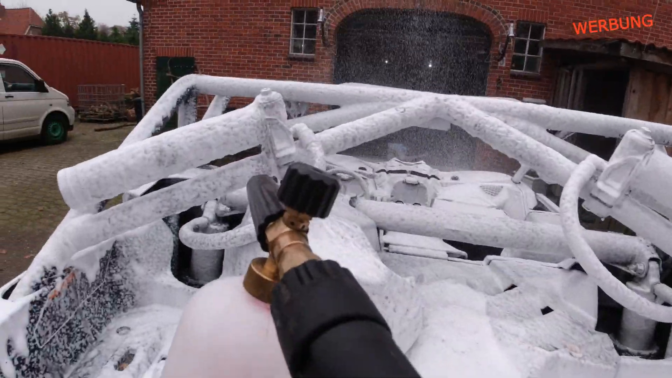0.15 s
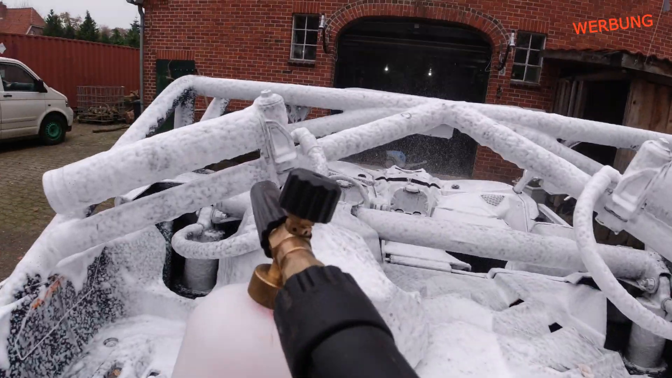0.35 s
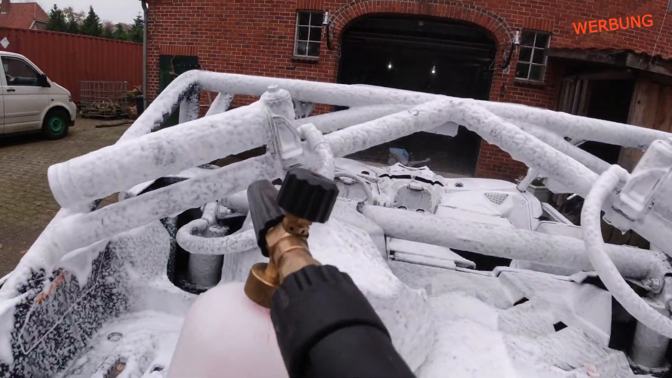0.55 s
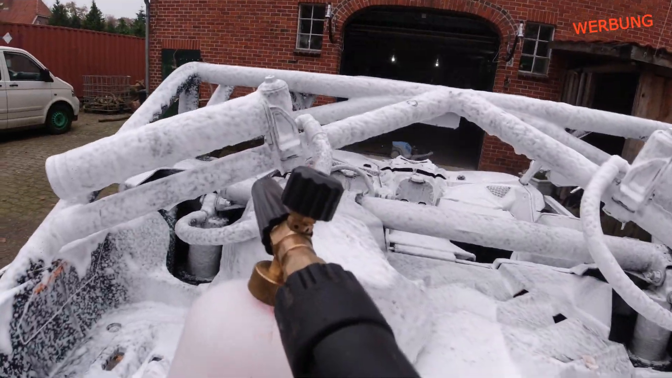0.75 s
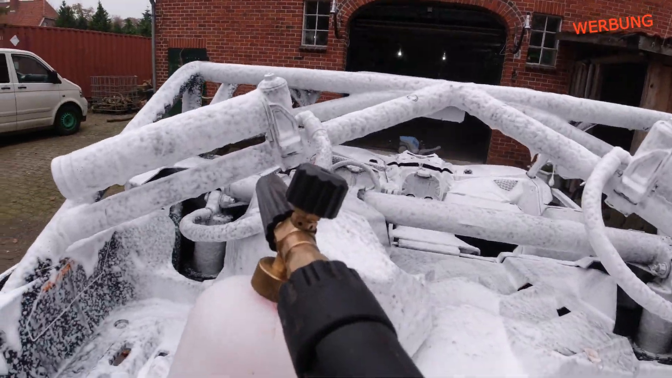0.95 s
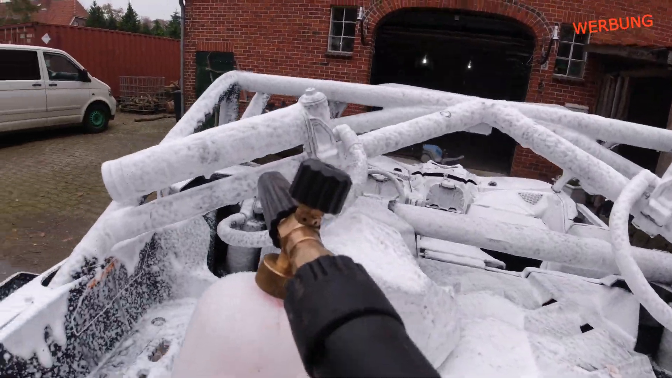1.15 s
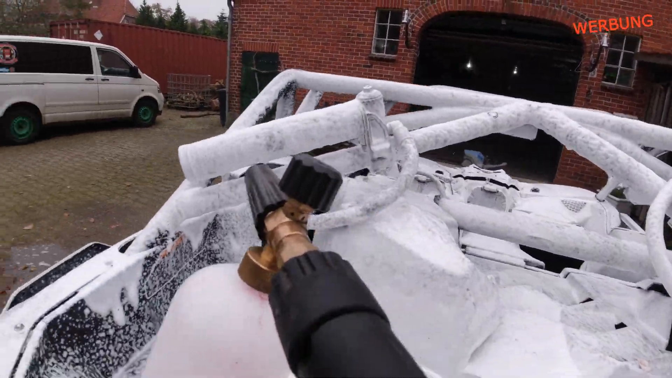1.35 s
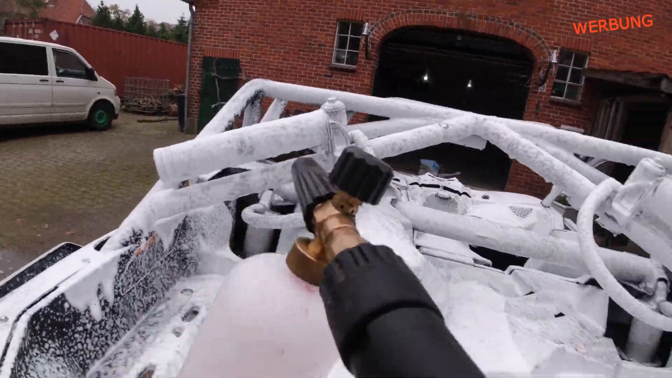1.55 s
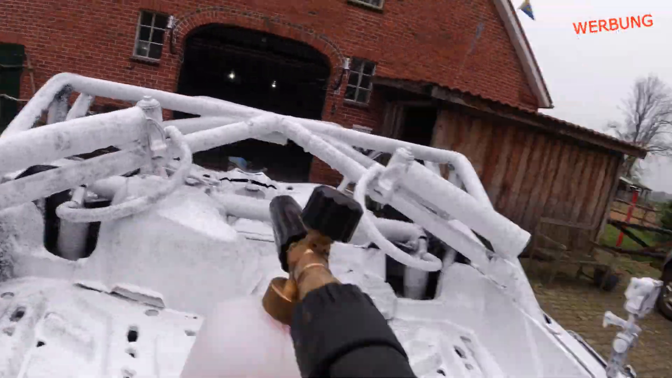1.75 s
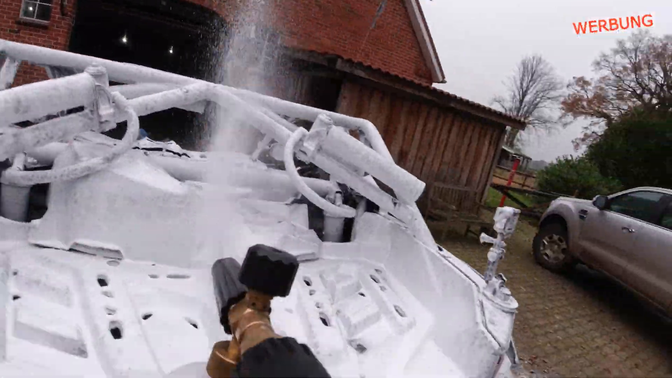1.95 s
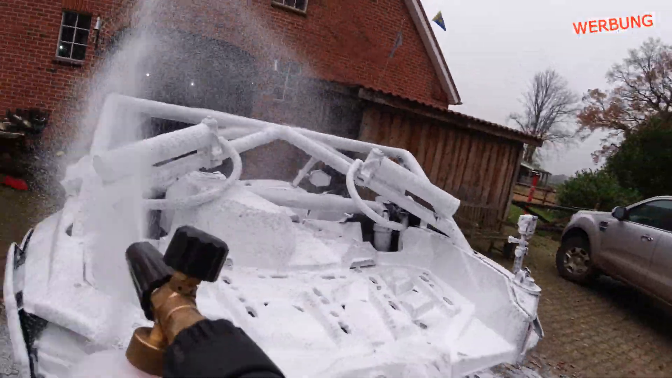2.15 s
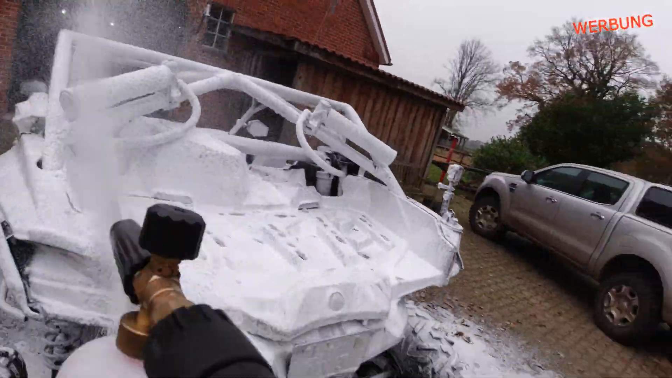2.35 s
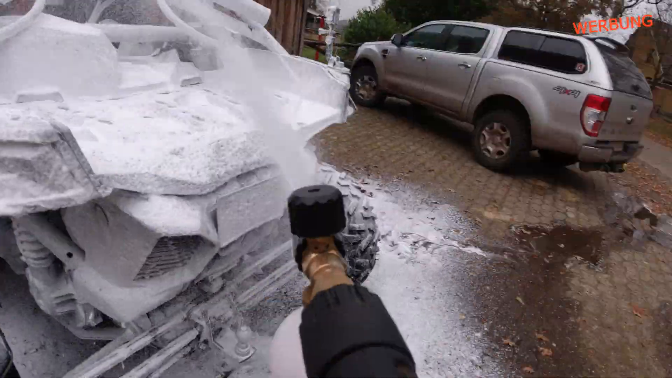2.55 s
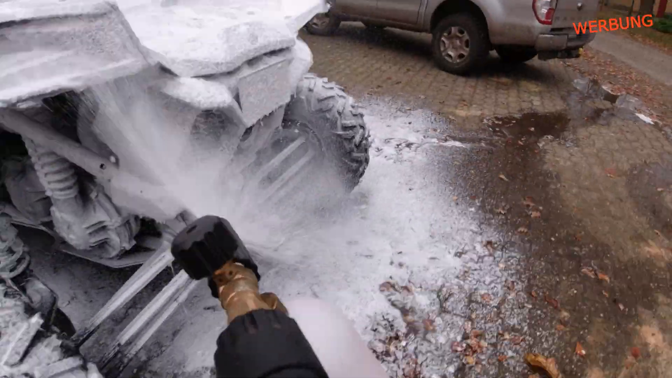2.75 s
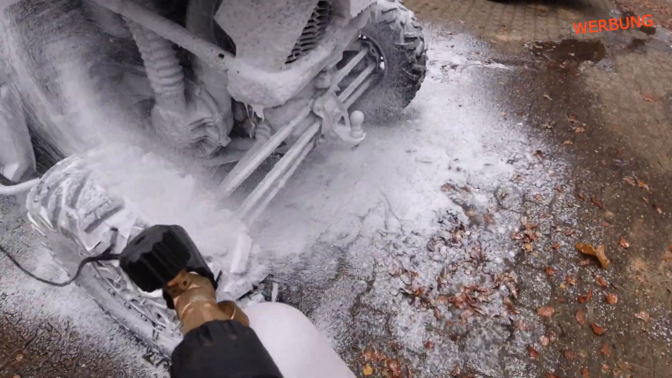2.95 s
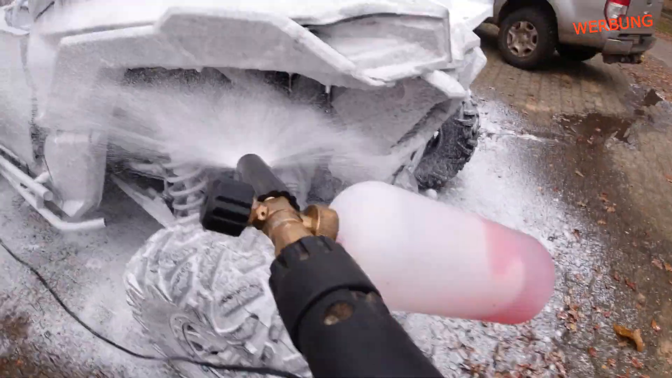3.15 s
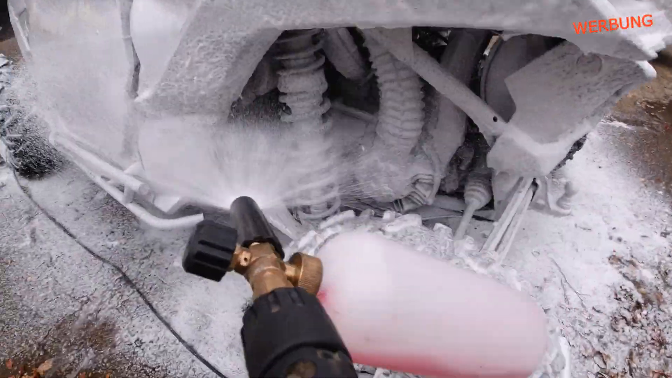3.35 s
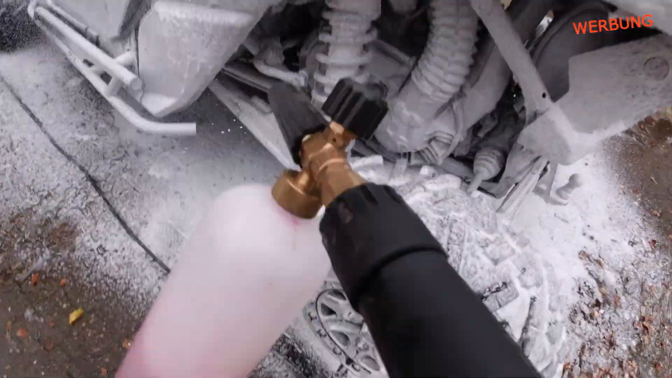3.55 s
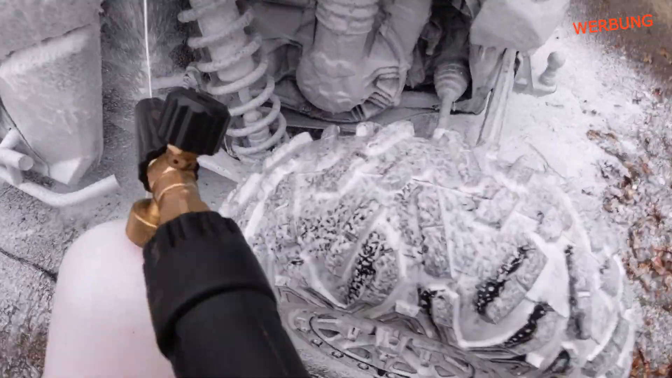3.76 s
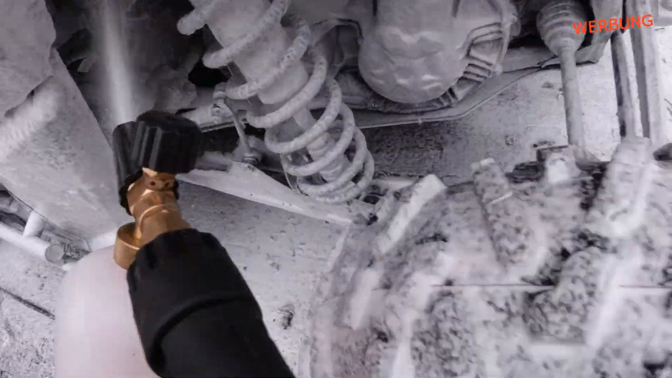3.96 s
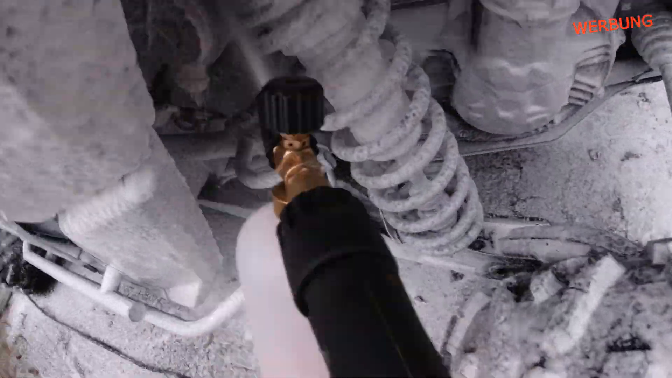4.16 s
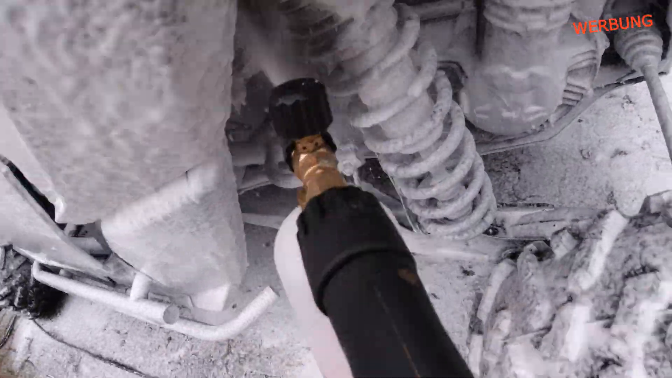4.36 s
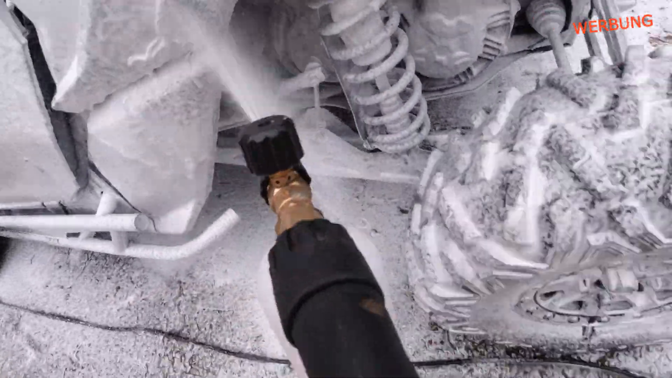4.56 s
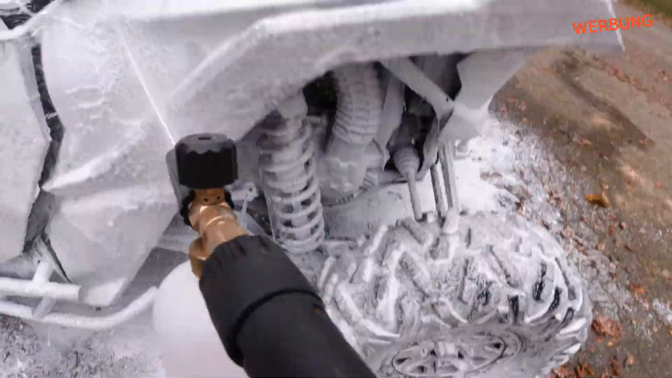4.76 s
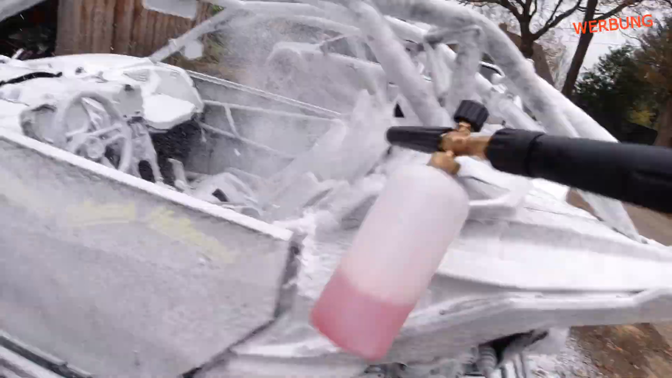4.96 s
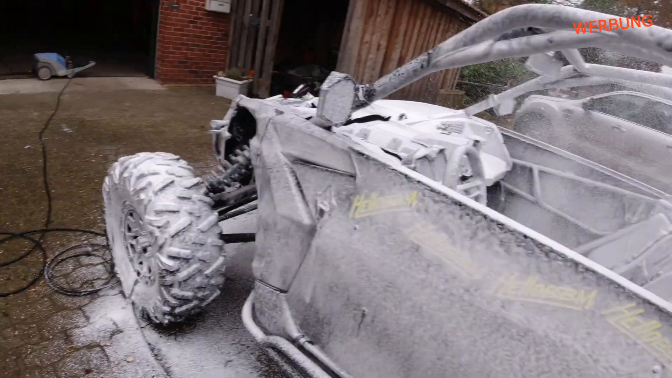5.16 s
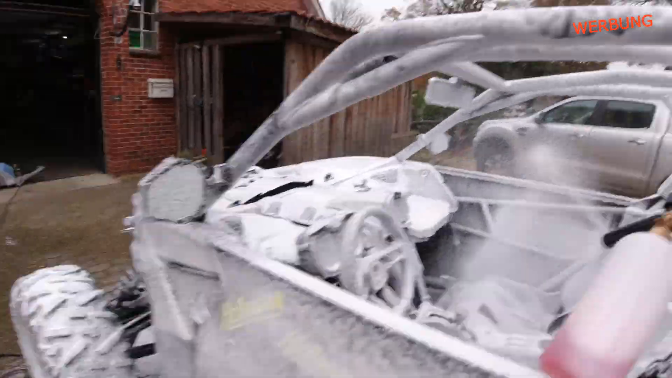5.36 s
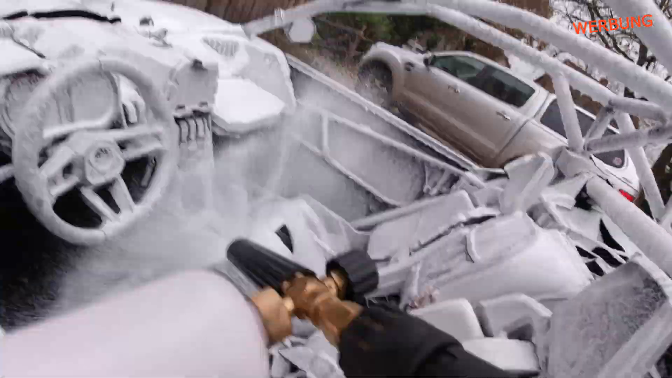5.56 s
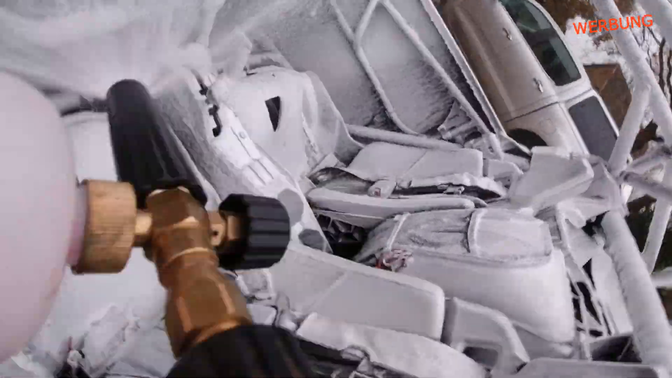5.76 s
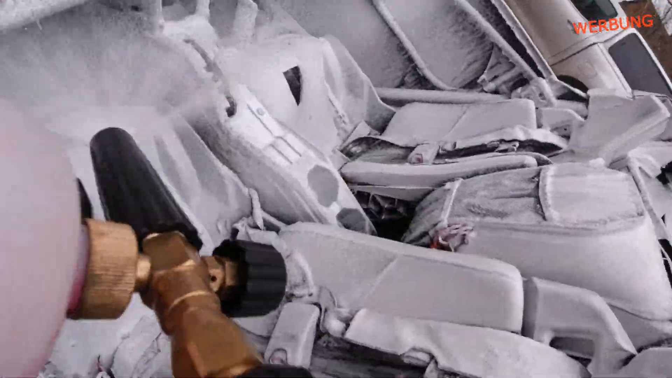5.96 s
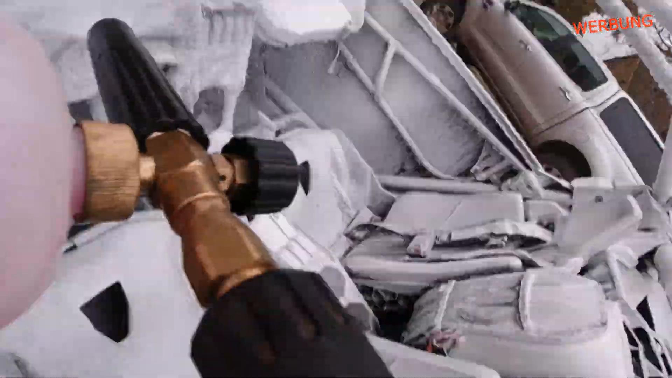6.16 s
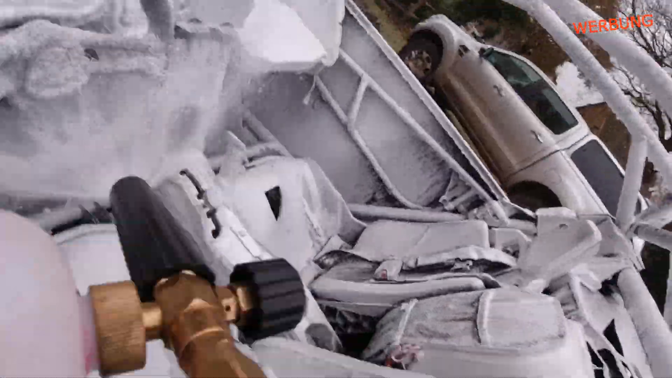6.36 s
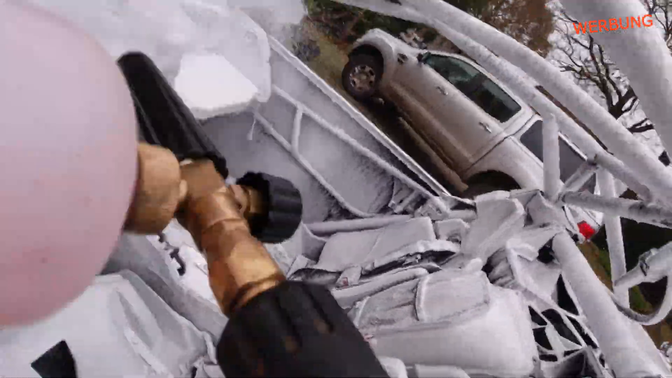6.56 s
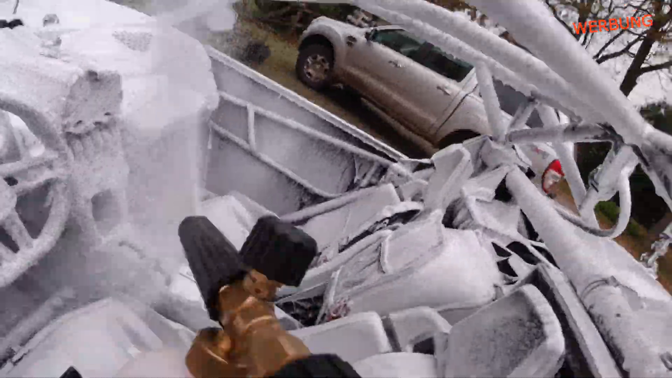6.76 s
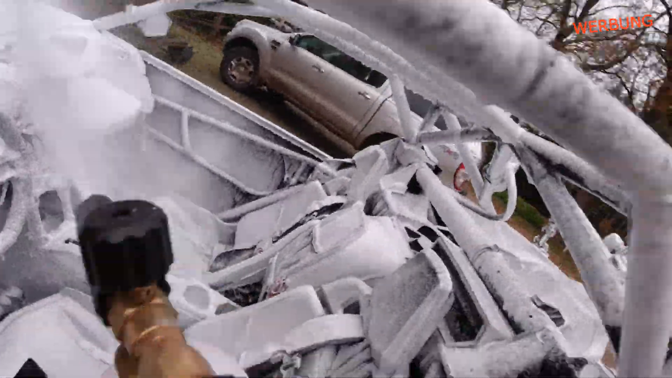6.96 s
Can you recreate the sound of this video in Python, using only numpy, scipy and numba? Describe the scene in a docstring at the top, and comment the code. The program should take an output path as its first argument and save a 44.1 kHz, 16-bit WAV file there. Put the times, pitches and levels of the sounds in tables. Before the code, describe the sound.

Outdoors in a yard, a pressure washer's foam jet cuts off at once, leaving faint clothing rustle and trigger clicks. Then it sprays a vehicle three times, close to the microphone, each pull starting with a spit and settling into a bright, ringing hiss with fine spatter. The pump hums and whines faintly further off. During the last pull the hiss dips briefly and the hose and lance knock dully.

```python
"""A pressure washer with a foam cannon lathers an off-road buggy in a yard, 7 s, heard by a worn two-port microphone.
The jet dies at once, the unloader sings (shaped noise); clothes rustle (drops); the heard background level rises slowly.
At 1.9, 3.8 and 4.8 s the jet spits, gulps air and hisses: resonant noise for the nozzle, drops for foam on panels.
Its pump hums and whines further off (unsteady sines); clicks (noise bursts) fall between the pulls.
In the last pull the operator turns to the pump, then reaches into the cabin; hose and lance knock (noise, modes)."""
import sys
import numpy as np
from scipy import signal
from scipy.fft import rfft, irfft
from scipy.io import wavfile
from scipy.ndimage import uniform_filter1d
from numba import njit

SR = 44100
rng = np.random.default_rng(int(sys.argv[2]) if len(sys.argv) > 2 else 0)


def wav_record(signal):
    """Record a signal, one row per channel, as 16-bit PCM in the file named by sys.argv[1]."""
    frames = np.transpose(np.atleast_2d(signal))
    bounded = np.clip(frames, -1, 1)
    # unit amplitude maps onto the largest positive 16-bit level
    quanta = np.round(bounded * 32767).astype(np.int16)
    wavfile.write(sys.argv[1], SR, quanta)


N = 308700
T = np.arange(N) / SR
HZ = np.maximum(np.fft.rfftfreq(N, 1 / SR), 1)
ALL_HZ = (0, SR)
PISTON_HZ = 141


def cannon():
    """Sum of the jet's parts, each gated by flow or foam, with body shadow and reflections; mid and side."""
    flow, foam = valve()
    sputter = jet_sputter()
    direct = (nozzle_ring(sputter) + edge_graze(sputter)) * foam
    direct = direct + nozzle_upper_ring(sputter) * np.sqrt(flow * foam)
    direct = direct + (jet_rush(sputter) + panel_drum(sputter) + panel_boom()) * flow
    mid, side = reflected(body_shadow(direct))
    side_db = -.3 + 3.6 * in_cabin()  # nozzle off to one side
    return np.array([mid, side * undb(side_db)]) + foam_splatter() * flow


# trigger pulls: [opens t/s, air gap t/s, gap depth level/dB, closes t/s, time to die away/s, strength level/dB]
TRIGGER_PULLS = [(-1.0, -.9, -20, .007, .07, -5.5), (1.881, 1.962, -22, 3.560, .12, 0),
                 (3.782, 3.857, -23, 4.681, .12, -.2), (4.809, 4.884, -15, 8.0, .12, -.7)]


def valve():
    """Gains of flow and of foam through the gun: trapped pressure spits, air gulps, then foam follows."""
    flow, foam = 0, 0
    for opens, gap, gap_db, closes, dying_s, db in TRIGGER_PULLS:
        spit_s = [opens - .03, opens - .011, opens, opens + .012,
                  gap - .023, gap - .006, gap + .008, gap + .020, gap + .034]
        spit_db = np.interp(T, np.sort(spit_s), [-62, -30, 2.2, 0, -4.5, gap_db, gap_db, -6, 0])
        closing = (T - closes) / dying_s
        shut = undb(-np.interp(closing, [0, .11, .33, 1, 2.5], [0, 16, 35, 50, 90]))
        gate = undb(db + spit_db) * shut * (T > opens - .03)
        refill_db = np.interp(T, [gap - .03, gap, gap + .07], [-3, -9, 0])
        flow = flow + gate
        foam = foam + gate * np.sqrt(shut) * undb(refill_db)
    return flow, foam


def jet_sputter():
    """Gain of the jet: slugs of air and soap at random, plus a slight throb from the pistons."""
    piston = np.cos(2 * np.pi * np.cumsum(PISTON_HZ * (1 + .015 * walk(12))) / SR)
    return undb(.6 * walk(520) + .22 * walk(70) + .35 * piston)


# lance swing: [t/s, nozzle to nearest panel/m]
LANCE_AIM = [(2.0, .21), (2.25, .29), (2.75, .37), (3.45, .38), (3.95, .22), (4.3, .19), (4.65, .25),
             (5.3, .3), (5.8, .24), (6.25, .225), (6.7, .3), (7.0, .27)]


def panel_distance_m():
    """Path from nozzle to nearest panel as the lance swings."""
    return curves(LANCE_AIM)[0]


def nearness():
    """Closeness to the panel, 1 at the usual .33 m."""
    return .33 / panel_distance_m()


def turned():
    """How far the operator faces from the jet towards the pump, 0-1."""
    return np.interp(T, [4.99, 5.27, 5.61], [0, 1, 0])


def in_cabin():
    """How far the operator has reached into the cabin, 0-1."""
    return np.interp(T, [5.4, 5.8], [0, 1])


def aimed(usual_db, halving_db, cabin_db, turned_db):
    """Gain of a spray part: at usual distance, plus per halving of it, in the cabin and when turned."""
    moves_db = halving_db * np.log2(nearness()) + cabin_db * in_cabin() + turned_db * turned()
    return undb(usual_db + moves_db)


# nozzle resonances: [f/Hz, width at half amplitude/Hz, level/dB]
NOZZLE_MODES = [(4210, 450, 0), (4030, 520, -7), (4900, 1300, -19)]
# ring flares as the nozzle swings past the listener: [t/s, length/s, level/dB]
RING_FLARES = [(2.28, .25, 3), (4.0, .07, 6), (4.44, .17, 5), (4.6, .1, 2.5), (5.79, .07, 8),
               (6.07, .09, 6.5), (6.33, .06, 4), (6.93, .15, 4.5)]


def nozzle_ring(sputter):
    """Noise driving the nozzle's main resonances; pitch wavers as foam in the bore thickens and thins."""
    among_panels = np.interp(T, [3.5, 3.9], [.3, 1])
    flare_db = sum(hump(*flare) for flare in RING_FLARES)
    flicker_db = 2.0 * among_panels * walk(24)
    source = noise() * sputter * undb(.6 * walk(250))
    ring = heard(source, resonances(NOZZLE_MODES), (3800, 4700), lead=.88)
    ring = ring * aimed(-30.4, -3.8, -2.3, -17) * undb(flare_db + flicker_db)
    return delayed(ring, .00045 * among_panels * walk(9))


# upper nozzle resonances: [f/Hz, width at half amplitude/Hz, level/dB]
NOZZLE_UPPER_MODES = [(7620, 1650, 0), (8750, 800, -11)]


def nozzle_upper_ring(sputter):
    """Noise driving the nozzle's broad upper resonances, level unsteady."""
    upper = heard(noise() * sputter, resonances(NOZZLE_UPPER_MODES), (6900, 8500))
    return upper * aimed(-35.8, -2.3, -2.5, -19) * undb(1.0 * walk(14))


# sliding note of foam grazing an edge: [t/s, f/Hz]
GRAZE_NOTE = [(3.55, 4750), (3.9, 3600), (4.1, 4700), (4.27, 5400), (4.95, 4000), (5.13, 5150),
              (5.55, 5100), (6.1, 4000), (6.5, 3750), (7.0, 4600)]


def edge_graze(sputter):
    """The fan of foam on an edge: noise through two moving band-passes."""
    hz, = curves(GRAZE_NOTE)
    edge = np.array([svf(svf(x, hz, 800.), hz, 800.) for x in noise() * sputter])
    return heard(edge, 1, ALL_HZ, lead=.7) * aimed(-43, 6.8, 1, -11.5)


# rush spectrum: [f/Hz, level/dB]
RUSH_SPECTRUM = [(40, -20), (120, -12.5), (230, -8), (350, -6), (500, -3), (850, -3), (1200, 1), (2000, 0),
                 (3100, 0), (5200, -1.5), (6200, -4), (9000, -5.5), (12500, -19), (16000, -24)]


def jet_rush(sputter):
    """Dense drops of the jet, broadband."""
    rush = heard(drops(12000, 1.7) * sputter, shape(RUSH_SPECTRUM), (2300, 3300), lead=.7)
    return rush * aimed(-41.4, 1.7, .4, -9.8)


def panel_drum(sputter):
    """Drops ring the hollow between jet and panel, higher as it narrows; louder in the wheel arch."""
    hollow_hz = 1080 + 115 / panel_distance_m()
    hollow = np.array([svf(x, hollow_hz, 520.) for x in drops(4500, 1.8) * sputter])
    drum = heard(hollow, resonances([(1550, 2400, 0)]), (1420, 2100), lead=.8)
    arch_db = hump(4.33, .3, 5.5)
    return drum * aimed(-40.2, -1, 1.7, -8) * undb(arch_db)


# boom spectrum: [f/Hz, level/dB]
BOOM_SPECTRUM = [(60, -25), (250, -9), (450, -1), (650, 0), (900, -1.5), (1180, 2), (1500, -12),
                 (4000, -35)]


def panel_boom():
    """Low boom of drops on the bodywork."""
    return heard(drops(4000, 1.8), shape(BOOM_SPECTRUM), ALL_HZ, lead=.6) * aimed(-57, 5, 10, -1)


# splatter spectrum: [f/Hz, level/dB]
SPLATTER_SPECTRUM = [(500, -20), (3000, -4), (6000, 1), (10000, 2), (13000, 0), (16000, -1)]


def foam_splatter():
    """Fine treble impacts of foam; a splash deep in the wheel arch."""
    splatter = heard(drops(12000, 1.9), shape(SPLATTER_SPECTRUM), (11000, 15500), lead=.55)
    splash_db = hump(4.33, .11, 11)
    return splatter * aimed(-52.7, 8.3, 4, .3) * undb(splash_db)


def body_shadow(direct):
    """Treble screened by the operator's body when turned: subtracts a share of a 6300 Hz band."""
    screened = np.array([svf(x, np.full(N, 6300.), 4200.) for x in direct])
    return direct - .6 * turned() * screened


def reflected(direct):
    """Panel mirrors the hiss after the round trip, sliding its colour; paving answers about 6.2 ms later."""
    mirror = .19 * nearness()  # share of the hiss
    round_trip_s = 2 * panel_distance_m() / 343  # speed of sound, m/s
    panel = mirror * delayed(direct, round_trip_s * (1 + .05 * walk(13)))
    paving = .2 * delayed(direct, .0062 * (1 + .03 * walk(1.5)))
    return (direct + panel + paving) / np.sqrt(1 + mirror ** 2)


# how strongly the working pump carries across the yard: [t/s, level/dB]
PUMP_CARRY = [(.2, -66), (1.0, -57), (2.9, -57.5), (3.5, -49.5), (3.9, -56.5), (4.6, -56.5), (7.0, -62)]
# unloader valve sings when the flow stops: [t/s, level/dB]
UNLOADER_SONGS = [(.012, -44.5), (3.587, -40), (4.715, -53)]


def pump():
    """Hum at twice piston rate, motor drone and whine, louder under load; the unloader's song."""
    rise_s, fall_s = .16, .13
    load = 0
    for opens, _, _, closes, _, _ in TRIGGER_PULLS:
        load = load + np.clip(np.minimum((T - opens) / rise_s, 1 - (T - closes) / fall_s), 0, 1)
    carry_db, = curves(PUMP_CARRY)
    facing = turned()

    def carried(loaded_db, idle_db, facing_db):
        """Gain relative to the carry, plus changes when idling and when faced."""
        return undb(carry_db + loaded_db + idle_db * (1 - load) + facing_db * facing)

    hum = tone(2 * PISTON_HZ, .009, 2.6) + tone(PISTON_HZ, .009, 2.6) * undb(-17)
    drone_hz = 433 - 11 * np.maximum(T - 2.3, 0)  # sags 11 Hz/s from 2.3 s
    tones = hum * carried(-1.2, -24, -7)
    tones = tones + tone(drone_hz, .014, 3.2) * carried(-1.8, -17, 4)
    tones = tones + tone(1362, .0014, 1.6) * carried(4, -35, 18)
    song = heard(noise(), resonances([(1350, 80, 0), (1190, 130, -2)]), ALL_HZ)
    song_gain = sum(undb(db) * decay(np.maximum(T - s, 0), .2, .002) for s, db in UNLOADER_SONGS)
    return np.array([tones, 0 * tones]) + song * song_gain


def tone(hz, wander, flutter_db):
    """Sine of unit rms before its random pitch wander and level flutter."""
    phase = 2 * np.pi * np.cumsum(hz * (1 + wander * walk(30))) / SR
    return np.sqrt(2) * np.sin(phase) * undb(flutter_db * walk(18))


# clicks of trigger and lance: [t/s, level/dB, ring f/Hz]
GUN_CLICKS = [(.143, -57, 1700), (.151, -59, 2400), (1.682, -48, 2400), (1.709, -49, 3600),
              (1.824, -57, 3600), (3.596, -49, 2400), (3.664, -54, 3200), (3.672, -54, 3600),
              (3.680, -54, 2300), (3.740, -50, 3600)]
# dull knocks of hose and lance: [t/s, level/dB, thud f/Hz, ring level/dB, ring spread/octaves]
HOSE_KNOCKS = [(.02, -54, 330, 3, .9), (1.684, -59.5, 350, 19, .2), (3.668, -48, 70, -18, .7),
               (5.376, -38, 270, 2, .6), (5.394, -39, 220, 2.5, .6), (5.562, -38, 200, 2, .6),
               (6.424, -31, 370, 3, .9), (6.786, -35, 235, 2, .55)]
# modes the knocks ring: [f/Hz, t60/s, level/dB]
HOLLOW_MODES = [(150, .12, -5), (218, .22, 0), (255, .1, -4), (338, .14, -3), (405, .1, -3), (570, .09, -7),
                (650, .09, -7)]


def handling():
    """Sharp resonant clicks; knocks, each a noise thud and a short ring of modes."""
    out = np.zeros((2, N))
    age = np.arange(int(.4 * SR)) / SR

    def burst(hz, width, side_db):
        """Mid and side noise in one steep resonance, mid at unit level."""
        centre = np.full(len(age), float(hz))
        raw = rng.standard_normal((2, len(age)))
        x = np.array([svf(svf(n, centre, float(width)), centre, float(width)) for n in raw])
        return x / x[0].std() * undb([[0], [side_db]])

    def add(s, sound):
        """Mix a sound in at its time."""
        start = max(int(s * SR), 0)
        out[:, start:start + len(age)] += sound[:, :N - start]

    for s, db, hz in GUN_CLICKS:
        click = burst(hz, 1300, -8) + undb(-8) * burst(6200, 4000, -4)
        add(s, undb(db) * click * decay(age, .026, .0004))
    for s, db, thud_hz, ring_db, octaves in HOSE_KNOCKS:
        ring = 0
        for hz, t60, mode_db in HOLLOW_MODES:
            # modes near the blow's own pitch ring most
            size = undb(mode_db) / (1 + (np.log2(hz / thud_hz) / octaves) ** 2)
            mode_hz = hz * (1 + .02 * rng.standard_normal())
            mode = np.sin(2 * np.pi * (mode_hz * age + rng.random()))
            ring = ring + size * mode * decay(age, t60, .003)
        thud = burst(thud_hz, 1.1 * thud_hz, -9) * decay(age, .15, .004)
        add(s, undb(db) * (thud + undb(ring_db) * np.array([ring, 0 * ring])))
    return out


# rustle spectrum: [f/Hz, level/dB]
RUSTLE_SPECTRUM = [(200, -14), (1200, -2), (3000, 1), (5000, -3), (6000, -6), (7000, -4), (8500, -11),
                   (10000, -15), (16000, -25)]
# brushes of sleeve and hose: [t/s, length/s, level above the faint constant rustle/dB]
BRUSHES = [(.07, .12, 17), (.46, .11, 11), (1.18, .17, 9), (1.48, .17, 17), (1.78, .2, 15)]


def clothes():
    """Sleeve and hose brush: treble drops in short bursts."""
    rustle = heard(drops(6000, 2.1), shape(RUSTLE_SPECTRUM), (4500, 9000), lead=.3)
    return rustle * undb(-93 + sum(hump(*brush) for brush in BRUSHES))


# air stirring at the ports as the operator walks: [t/s, level/dB]
BUFFET_LEVEL = [(1.3, -88), (1.9, -70), (3.3, -69), (3.7, -64), (7.0, -61)]


def port_buffet():
    """Unsteady low noise of air at the ports."""
    spectrum = shape([(20, -4), (70, 0), (140, -2), (400, -24), (2000, -70)])
    level_db, = curves(BUFFET_LEVEL)
    return heard(noise(), spectrum, ALL_HZ, lead=.1) * undb(level_db + 3.8 * walk(11))


# foam run-off spectrum: [f/Hz, level/dB]
RUNOFF_SPECTRUM = [(200, -8), (650, -7), (950, 3), (1300, 0), (1650, 0), (2200, -2), (3200, -6),
                   (4500, -14), (6000, -24), (10000, -36), (16000, -44)]


def foam_runoff():
    """Foam fizzing and running off: shaped drops, at the background's heard level."""
    runoff = heard(drops(8000, 1.8), shape(RUNOFF_SPECTRUM), (700, 3000), lead=.3)
    return runoff * undb(background_db(-79.5, -68.5))


# open-air rumble spectrum: [f/Hz, level/dB]
YARD_SPECTRUM = [(25, -2), (60, -2), (130, 0), (210, 0), (320, -6), (440, -5), (540, -18), (1200, -35),
                 (16000, -60)]


def yard_rumble():
    """Open-air rumble: low noise, slightly unsteady, at the background's heard level."""
    air = heard(noise(), shape(YARD_SPECTRUM), (60, 380), lead=.2)
    return air * undb(background_db(-73.5, -66.2) + 1.5 * walk(14))


def background_db(first_db, final_db):
    """Heard background level, rising slowly after the first jet stops."""
    return np.interp(T, [.25, 1.55], [first_db, final_db])


def undb(db):
    """Decibels to gain."""
    return 10 ** (np.asarray(db) / 20)


def curves(rows):
    """Columns of a table, joined by straight lines in time."""
    s, *columns = np.transpose(rows)
    return [np.interp(T, s, c) for c in columns]


def shape(points):
    """Gain at every frequency from (Hz, dB) points."""
    hz, db = np.transpose(points)
    return undb(np.interp(np.log(HZ), np.log(hz), db))


def resonances(modes):
    """Gain at every frequency of steep, independently driven resonances: their powers add."""
    power = 0
    for hz, width, db in modes:
        detuning = (HZ / hz - hz / HZ) * hz / width
        power = power + undb(2 * db) / (1 + detuning ** 2) ** 2
    return np.sqrt(power)


def walk(rate):
    """Random levels held 1 / rate s and slewed twice; unit spread."""
    k = max(int(SR / rate), 2)
    held = np.repeat(rng.standard_normal(N // k + 1), k)
    w = uniform_filter1d(uniform_filter1d(held, k), k)[:N]
    return w / w.std()


def noise():
    """Two unrelated noises: straight and scattered."""
    return rng.standard_normal((2, N))


def drops(rate, spread_db):
    """Dense impacts of unequal size, straight and scattered; rate per second."""
    size = undb(spread_db * np.minimum(rng.exponential(size=N), 4))
    x = noise() * size * (rng.random(N) < rate / SR)
    return x / x.std()


def decay(age, t60, rise):
    """Envelope with a quick start and exponential decay, seconds."""
    return (1 - np.exp(-age / rise)) * np.exp(-np.log(1000) * age / t60)


def hump(s, length, db):
    """Smooth rise and fall in dB, `length` wide at half its height."""
    return db * .5 ** ((2 * (T - s) / length) ** 2)


def delayed(x, lag_s):
    """Both channels, later by a changing time."""
    return np.array([np.interp(T - lag_s, T, channel, left=0) for channel in x])


@njit
def svf(x, hz, width):
    """State-variable band-pass with a moving centre."""
    y, b, l = np.empty(len(x)), 0., 0.
    for i in range(len(x)):
        g, k = np.tan(np.pi * hz[i] / SR), width / hz[i]
        v = (b + g * (x[i] - l)) / (1 + g * (g + k))
        b, l, y[i] = 2 * v - b, l + 2 * g * v, k * v
    return y


# side against mid at the two microphone ports: [f/Hz, level/dB]
PORT_SIDE = [(30, 0), (60, -3), (110, -6), (220, -10.5), (700, -14.5), (1300, -14.2), (2400, -10),
             (4400, -4.1), (8100, -4), (15000, -4.5)]


def heard(x, gain, band, lead=.75):
    """Mid and side, mid at unit level in the band (Hz); port lag turns the side a quarter cycle."""
    straight, scattered = rfft(x) * gain
    share = np.clip(lead * HZ / (HZ + 300) / (1 + (HZ / 13000) ** 4), 0, 1)
    side = shape(PORT_SIDE) * (1j * share * straight + np.sqrt(1 - share ** 2) * scattered)
    inside = (HZ > band[0]) & (HZ < band[1])
    return irfft(np.array([straight, side]), N) / irfft(straight * inside, N).std()


def scene():
    """All sources, from mid and side to left and right."""
    background = clothes() + port_buffet() + foam_runoff() + yard_rumble()
    mid, side = cannon() + pump() + handling() + background
    return np.array([mid + side, mid - side])


def record(dry):
    """Rounds the tallest peaks (tanh) and cuts steeply above 15850 Hz."""
    rounded = .42 * np.tanh(dry / .42)
    return signal.sosfilt(signal.ellip(12, .1, 80, 15850, fs=SR, output="sos"), rounded)


dry = scene()
out = record(dry)
wav_record(out)
```